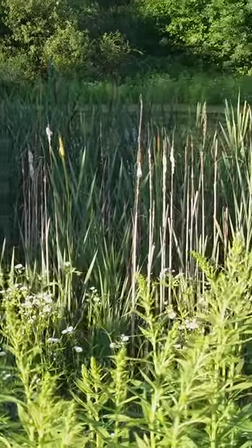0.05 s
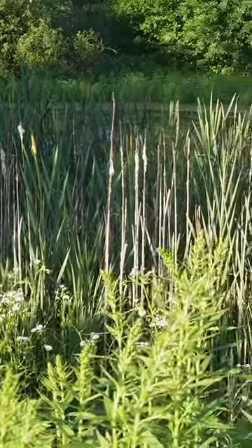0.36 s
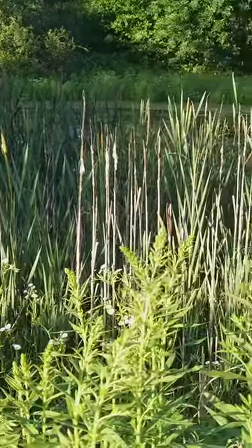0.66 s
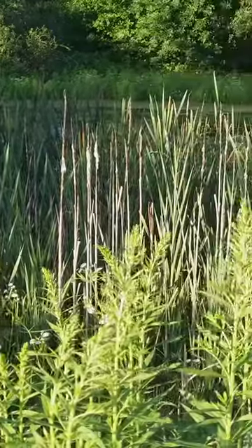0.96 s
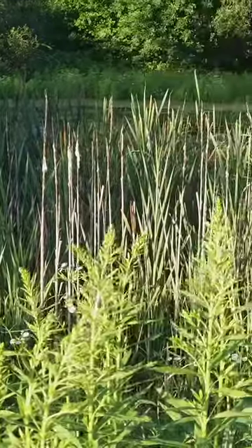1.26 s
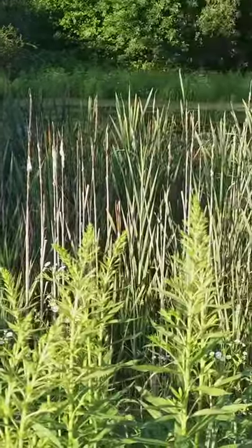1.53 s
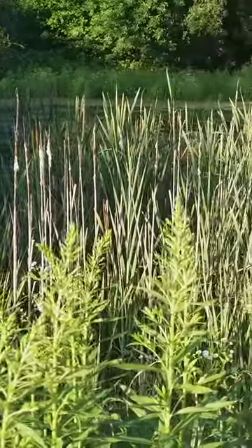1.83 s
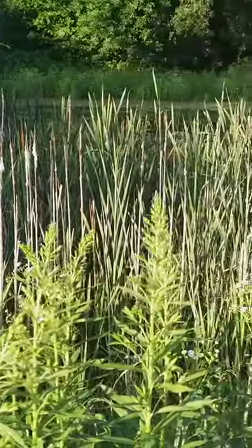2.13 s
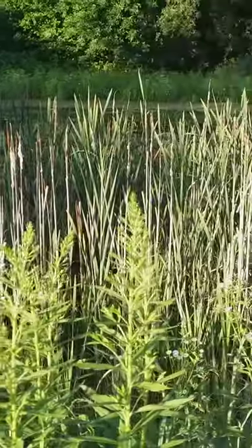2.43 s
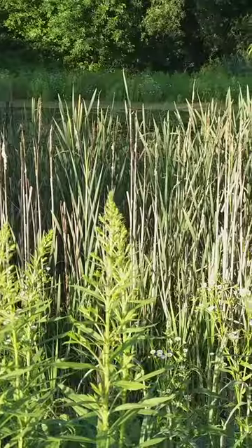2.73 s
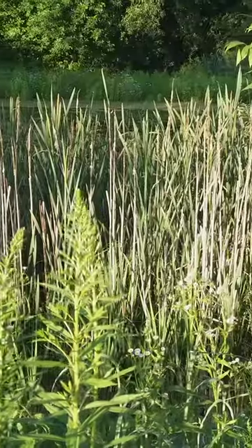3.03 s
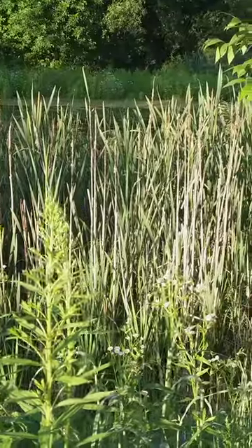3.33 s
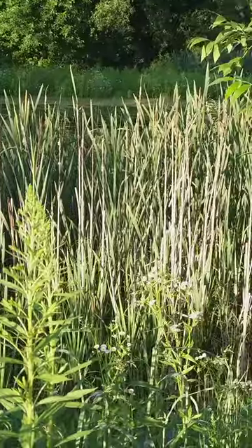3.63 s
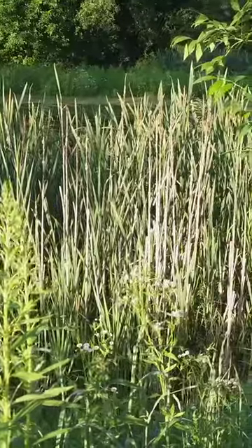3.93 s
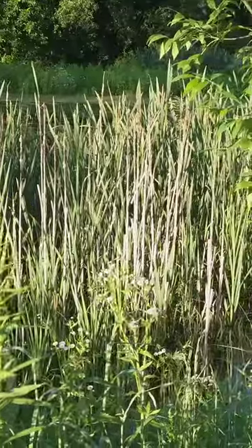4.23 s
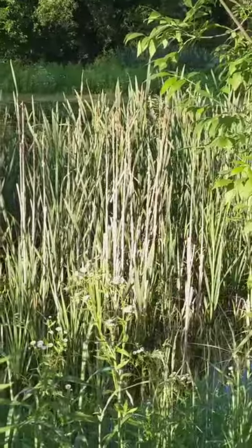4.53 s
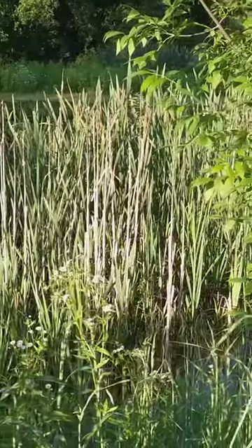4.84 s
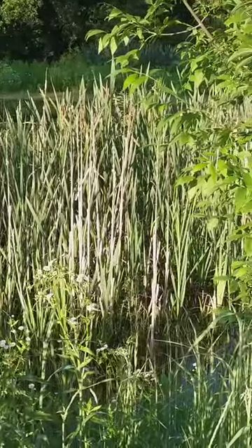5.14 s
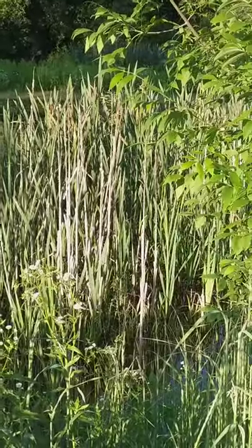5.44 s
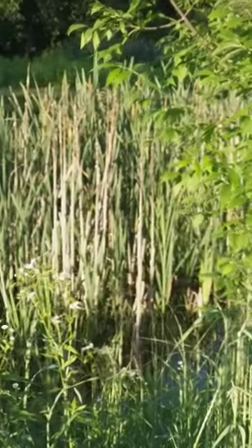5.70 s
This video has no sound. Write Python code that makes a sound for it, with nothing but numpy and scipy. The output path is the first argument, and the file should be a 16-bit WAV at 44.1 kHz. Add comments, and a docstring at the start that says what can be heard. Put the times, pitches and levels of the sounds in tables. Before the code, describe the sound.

A steady low rumble of distant traffic, with one faint wavering engine, runs under six seconds at a reedy pond. Toads are the main sound: soft, almost pure, medium-low hoots that swell and sag slightly in pitch. They come in overlapping twos and threes around 0.4, 1.5, 2.4, 4.1 and 5.2 seconds, with a single one at 3.2. Across the water, slightly right, a dog gives short hoarse barks with a light echo at about 0.6, 1.1, 2.5, 3.0 and 4.5 seconds. Small birds add faint, thin falling whistles, chips and chirps until 2.5 seconds, with a brief warble near one second. Close by, grass swishes quietly on and off, most clearly from 0.6 to 1 second and near 5.4. Dry stalks tick and snap here and there, with a sharper cluster of cracks around 4.6 seconds and another crack at 5.3.

```python
"""Toads hoot soft falling notes that overlap and beat, each vocal sac ringing as a near-pure tone.
Across the reedy summer pond a dog gives short barks, hoarse from period doubling; small birds whistle.
Close by, grass blades swish past each other and dry stalks snap.
Distant traffic rumbles underneath, with the drone of one engine."""
import sys
import numpy as np
from scipy import signal
from scipy.fft import rfft, irfft
from scipy.io import wavfile
from scipy.ndimage import uniform_filter1d

SR = 44100
rng = np.random.default_rng(int(sys.argv[2]) if len(sys.argv) > 2 else 0)


def bounce(signal):
    """Save signal as a 16-bit WAV file at the path given by the first command-line argument."""
    frames = np.transpose(np.atleast_2d(signal))
    limited = np.clip(frames, -1, 1)
    pcm = np.round(limited * 32767).astype(np.int16)
    wavfile.write(sys.argv[1], SR, pcm)


N = 254456
TIME = np.arange(N) / SR


# start_s, length_s, first_pitch_hz, level_db, crest_fraction
HOOTS = [(.37, 0.38, 465, -42.5, 0.6), (.425, 0.14, 493, -44.5, 0.6), (.505, 0.35, 503.5, -42.5, 0.27),
         (1.525, 0.17, 500.4, -46, 0.28), (1.66, .19, 471, -42.5, 0.27), (2.275, 0.27, 499.4, -49, 0.21),
         (2.47, 0.26, 506, -40.5, 0.28), (2.525, .27, 460.3, -40.5, 0.23), (3.225, .36, 469.5, -43, 0.63),
         (4.105, .18, 509, -38, 0.51), (4.278, 0.11, 492, -44, 0.24), (4.367, 0.26, 467, -42, 0.26),
         (5.24, 0.33, 504.6, -40, 0.56), (5.298, 0.18, 459, -43, 0.14)]


def toads(slack_hz=453.3, sag_fraction=.407):
    """Each vocal sac rings as one tone that swells, trembles and sags toward the slack throat's pitch."""
    out = np.zeros(N)
    for start, length, first_hz, db, crest in HOOTS:
        u = np.linspace(0, 1, int(length * SR))
        hz = first_hz - sag_fraction * (first_hz - slack_hz) * (1 - (1 - u) ** 2)
        phase = 2 * np.pi * np.cumsum(hz * (1 + .0082 * wander(57.7)[:len(u)])) / SR
        swell = np.sin(np.pi / 2 * np.interp(u, [0, crest, 1], [0, 1, 0]))
        swell **= np.where(u < crest, .7, 1.2)
        tremble_db = 1.5 * wander(55)[:len(u)]
        add(out, start, np.sqrt(2) * undb(db + tremble_db) * swell * np.sin(phase))
    return outdoors(out * pan(-2.2), reeds_db=-19, trees_db=-15.5, trees_t60_s=.8)


# centre_hz, width_hz, gain_db
THROAT_RESONANCES = [(685, 144, 5), (919, 53, 0), (1144, 430, -11), (1815, 190, -16.5)]
# start_s, length_s, top_pitch_hz, relative_db, roughness_fraction
BARKS = [(0.603, 0.092, 457, -41, 0.65), (1.135, .135, 464.4, -41, 0.18), (2.507, .11, 480.3, -40, 0.66),
         (3.002, .138, 436.5, -40.5, 0.66), (4.505, .11, 461.6, -38.5, 0.26)]


def dog(tree_echo_s=.108, tree_echo_db=-17):
    """Pitch arches as the jaw opens; period doubling puts lines between the harmonics."""
    out = np.zeros(N)
    orders = np.arange(2, 12)[:, None] / 2
    for start, length, top_hz, db, rough in BARKS:
        u = np.linspace(0, 1, int(length * SR))
        jaw = np.interp(u, [0, .2, .42, .73, .9, 1], [0, .05, 1, 1, .15, 0])
        jitter = 1 + .08 * rough * wander(140)[:len(u)]
        lines_hz = orders * top_hz * (.62 + .38 * jaw) * jitter
        throat = sum(undb(gain_db) / np.hypot(1, (lines_hz - centre_hz) / (width_hz / 2)) ** 1.76
                     for centre_hz, width_hz, gain_db in THROAT_RESONANCES)
        # a closing mouth muffles everything above the lowest resonance
        octaves_above = np.log2(np.maximum(lines_hz / THROAT_RESONANCES[0][0], 1))
        muffle = undb(-12 * (1 - jaw) * octaves_above)
        doubling = np.where(orders % 1 > 0, .3 + rough, 1)
        shimmer = 1 + (.27 + .58 * rough) * wander(200)[:lines_hz.size].reshape(lines_hz.shape)
        phase = 2 * np.pi * (np.cumsum(lines_hz, axis=1) / SR + rng.random(orders.shape))
        voice = unit_rms(np.sum(throat * muffle * doubling * shimmer * np.sin(phase), axis=0))
        effort = np.interp(u, [0, .04, .2, .45, .8, 1], [0, .75, .6, 1, 1, .4])
        bark = undb(db) * effort * voice
        add(out, start, bark)
        add(out, start + tree_echo_s, undb(tree_echo_db) * bark)
    return outdoors(out * pan(-3.8), reeds_db=-7, trees_db=-11, trees_t60_s=.7) * undb(-1.3)


# start_s, relative_db
WHISTLES = [(0.214, -70), (1.087, -73), (2.14, -76.5)]
# start_s, length_s, first_pitch_hz, last_pitch_hz, relative_db
WARBLE_NOTES = [(.935, .05, 4360, 4200, -63), (0.962, 0.076, 3660, 3770, -61.5),
                (1.036, 0.051, 3930, 4550, -55.5), (1.086, .032, 5580, 5820, -55),
                (1.176, 0.045, 3380, 3550, -61.5), (1.208, 0.054, 3214, 3455, -57.5),
                (1.318, 0.038, 2847, 2820, -58)]
# start_s, relative_db
CHIRPS = [(.28, -64), (1.30, -64), (1.54, -68), (2.135, -70), (2.38, -70)]


def birds(chip_count=7, chip_period_s=.113):
    """Thin falling whistles, a run of chips, a burry warble and rising chirps, blurred by foliage."""
    out = np.zeros(N)
    for start, db in WHISTLES:
        add(out, start, bird_note(length_s=.364, first_hz=7400, last_hz=6726.6, db=db, burr=.003))
    for start in .1 + chip_period_s * np.arange(chip_count):
        add(out, start, bird_note(length_s=.03, first_hz=3900, last_hz=3090, db=-69))
    for start, length, first_hz, last_hz, db in WARBLE_NOTES:
        add(out, start, bird_note(length, first_hz, last_hz, db))
    for start, db in CHIRPS:
        add(out, start, bird_note(length_s=.0286, first_hz=3720, last_hz=4340, db=db))
    return outdoors(out * pan(2), reeds_db=-1, trees_db=-3.5, trees_t60_s=.62) * undb(-6.2)


def bird_note(length_s, first_hz, last_hz, db, burr=.023):
    """A gliding tone that swells and fades, its pitch shaken by the burr."""
    u = np.linspace(0, 1, int(length_s * SR))
    hz = first_hz * (last_hz / first_hz) ** u * (1 + burr * wander(600)[:len(u)])
    swell = np.sqrt(u * (1 - u))
    return undb(db) * unit_rms(swell * np.sin(2 * np.pi * np.cumsum(hz) / SR))


# frequency_hz, gain_db
BLADE_SPECTRUM = [(1200, 7.5), (2500, -3.5), (3500, -5), (5000, -1.5), (6900, 2.5), (8200, -10),
                  (10000, -16), (16000, -29)]
FIZZ_SPECTRUM = [(6000, -17), (9000, -10.5), (12300, -3), (14000, -6), (16000, -8.5)]
# time_s, relative_db
STIR = [(0, -74.5), (1.55, -81), (2.3, -82), (4.1, -76), (4.55, -69), (5.77, -66.5)]
# start_s, rise_s, hold_s, relative_db, fizz_share_db
SWISHES = [(0.605, 0.032, 0.047, -58, -5), (0.723, 0.035, 0.12, -62.5, -5.5),
           (.85, 0.051, 0.064, -59.5, -4), (1.03, 0.15, .07, -66, -7.5), (1.61, 0.026, .005, -62.5, -9),
           (1.634, .05, 0.095, -69, -4.5), (1.822, 0.06, 0.056, -65.5, -4), (2.46, 0.043, 0.071, -67, -7),
           (2.618, .13, 0.086, -70, -5), (3.04, .06, 0.065, -64.5, -4), (3.197, .08, 0.36, -70, -4),
           (3.817, 0.092, 0.044, -67.5, -2), (4.145, 0.085, .22, -66.5, -3.5), (4.577, .04, 0.049, -62, -3),
           (4.78, 0.058, .03, -66, -1), (4.92, 0.11, .02, -65, -3.5), (5.246, 0.036, 0.13, -62.5, -4),
           (5.387, 0.08, 0.017, -56, -3)]


def grass(stir_fizz_db=-4):
    """Blades slide past each other in a dense spray of tiny ticks: swishes over a continuous stir."""
    motions = [(undb(np.interp(TIME, *np.transpose(STIR))), stir_fizz_db)]
    for start, rise, hold, db, fizz_db in SWISHES:
        motions.append((undb(db) * swish(start, rise, hold), fizz_db))
    power = sum(level ** 2 for level, _ in motions)
    fizz_power = sum((level * undb(fizz_db)) ** 2 for level, fizz_db in motions)
    fizz_share = np.clip(fizz_power / power, 0, .9)
    grains = unit_rms(undb(2 * wander(900) + wander(60)))
    body = colour(diffuse_noise() * grains, BLADE_SPECTRUM) * np.sqrt(1 - fizz_share) * pan(2.6)
    fizz = colour(diffuse_noise() * grains, FIZZ_SPECTRUM) * np.sqrt(fizz_share) * pan(-.8)
    return np.sqrt(power) * (undb(7) * body + undb(5) * fizz)


def swish(start_s, rise_s, hold_s):
    """Envelope that builds, holds and dies as the blades settle; slow swishes settle longer."""
    age_s = TIME - start_s
    settle_s = .05 + .27 * rise_s
    return np.clip(age_s / rise_s, 0, 1) * np.exp(-np.maximum(age_s - rise_s - hold_s, 0) / settle_s)


# frequency_hz, gain_db
TICK_SPECTRUM = [(2000, 0.5), (3500, -17), (4700, -0.5), (6700, 3.5), (8200, -10), (10000, -21),
                 (16000, -6)]
CRACK_SPECTRUM = [(400, -26), (1000, 12), (1800, 19), (2500, 5), (3500, 1), (6000, -47)]
# start_s, relative_db, break_fraction
SNAPS = [(.038, -47, .05), (.189, -48.5, 0.4), (.208, -52, .5), (.751, -48, 0.43), (.883, -46, .15),
         (2.529, -46, 0), (2.64, -51, 0.27), (3.426, -43.5, 0.086), (4.35, -46.5, 0.74),
         (4.3937, -49, 0.94), (4.5939, -40, 0.84), (4.619, -42, 0.9), (4.655, -40, 0.92), (5.285, -39.5, 1),
         (5.391, -46, .1), (5.674, -49, 0.78)]


def stalks(faint_count=12):
    """A dry stalk gives way with a tick; a partial break adds fizz, a full one a low crack as well."""
    layers = np.zeros((3, 2, N))
    t = TIME[:SR // 16]
    decay = np.exp(-t / .0012) + .17 * np.exp(-t / .009)
    faint_ticks = [(when * TIME[-1], -67.5 + 5 * size, .2) for when, size in rng.random((faint_count, 2))]
    for start, db, broken in SNAPS + faint_ticks:
        crack_db = np.interp(broken ** 2, [0, 1], [-21, 9])
        fizz_db = np.interp(1 - (1 - broken) ** 2, [0, 1], [-23, 1.5])
        gains = undb(db + np.array([0, crack_db, fizz_db]))[:, None, None]
        direct = rng.standard_normal((3, 1, len(t)))
        scatter = .5 * rng.standard_normal((3, 2, len(t)))
        add(layers, start, gains * (direct + scatter) * decay * pan(2.2))
    tick, crack, fizz = layers
    return (undb(-3) * colour(tick, TICK_SPECTRUM)
            + undb(-3.8) * colour(crack, CRACK_SPECTRUM)
            + undb(-3.5) * colour(fizz, FIZZ_SPECTRUM))


# frequency_hz, gain_db
RUMBLE_SPECTRUM = [(20, -25), (35, -6.5), (48, 4.5), (80, -0.5), (125, -5), (200, -14.5), (400, -12),
                   (650, -8), (950, -9.5), (1400, -15), (1900, -16.5), (2400, -32.5), (4000, -36.5),
                   (16000, -56.5)]
# frequency_hz, left_minus_right_db
RUMBLE_BALANCE = [(60, 1.5), (200, -2.5), (400, 0), (1300, -5.5), (2300, -4), (4400, 6.5)]
# pitch_hz, level_db
ENGINE_PARTIALS = [(48.4, -67.5), (96.9, -59.5)]


def traffic():
    """Rumble of far traffic and moving air, with one wavering engine."""
    rumble = colour(diffuse_noise(), RUMBLE_SPECTRUM) * undb(-49 + .58 * wander(2.85))
    balance = undb(per_bin(RUMBLE_BALANCE) * np.array([[.5], [-.5]]))
    rumble = irfft(rfft(rumble) * balance, N)
    engine_time_s = np.cumsum(1 + .01364 * wander(5.6)) / SR
    drone = sum(np.sqrt(2) * undb(db + 1.8 * wander(4.76)) * np.sin(2 * np.pi * hz * engine_time_s)
                for hz, db in ENGINE_PARTIALS)
    return rumble + drone


def outdoors(x, reeds_db, trees_db, trees_t60_s, reeds_t60_s=.15):
    """Direct sound, quick scatter from the reeds and a longer echo from the trees."""
    reeds = unit_rms(undb(-60 * TIME / reeds_t60_s)) * undb(reeds_db)
    trees = unit_rms(undb(-60 * TIME / trees_t60_s) * np.minimum(TIME / .06, 1)) * undb(trees_db)
    response = diffuse_noise() * np.hypot(reeds, trees) / np.sqrt(N)
    return x + signal.fftconvolve(x, response, axes=1)[:, :N]


# frequency_hz, coherence
EAR_COHERENCE = [(130, 0.94), (330, 0.948), (640, 0.79), (1400, 0.046), (2600, -0.27), (7000, 0.18)]


def diffuse_noise():
    """White noise at two ears: alike in the bass, nearly unrelated in the treble."""
    coherence = per_bin(EAR_COHERENCE)
    weights = np.sqrt([(1 + coherence) / 2, (1 - coherence) / 2])
    mid, side = rfft(rng.standard_normal((2, N))) * weights
    return irfft(np.array([mid + side, mid - side]), N)


def undb(db):
    """Decibels to gain."""
    return 10 ** (np.asarray(db) / 20)


def unit_rms(x):
    """Scale to rms 1."""
    return x / np.sqrt(np.mean(x ** 2) + 1e-20)


def per_bin(points):
    """Interpolate (frequency_hz, value) rows at every FFT bin."""
    hz, value = np.transpose(points)
    return np.interp(np.log(np.arange(N // 2 + 1) * SR / N + 1), np.log(hz), value)


def colour(x, spectrum):
    """Filter by a spectrum, keeping the power of white noise."""
    return irfft(rfft(x) * unit_rms(undb(per_bin(spectrum))), N)


def wander(rate_hz):
    """Smooth random curve, rms 1."""
    step = int(SR / rate_hz)
    stairs = np.repeat(rng.standard_normal(N // step + 1), step)
    return unit_rms(uniform_filter1d(stairs, step)[:N])


def pan(left_minus_right_db):
    """Left and right gains."""
    return undb(left_minus_right_db * np.array([[.5], [-.5]]))


def add(track, start_s, sound):
    """Mix a sound into a track."""
    i = int(start_s * SR)
    track[..., i:i + sound.shape[-1]] += sound[..., :N - i]


def scene():
    """The pond and its surroundings, in stereo."""
    return toads() + dog() + birds() + grass() + stalks() + traffic()


def record(dry):
    """Steep low-pass on the top treble."""
    cutoff_hz = 15850
    return signal.sosfilt(signal.ellip(10, .1, 70, cutoff_hz, fs=SR, output="sos"), dry)


dry = scene()
out = record(dry)
bounce(out)
```